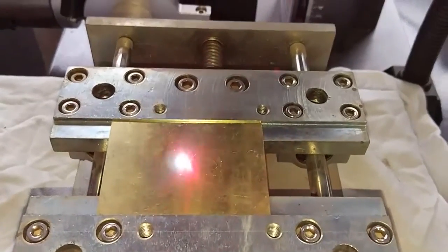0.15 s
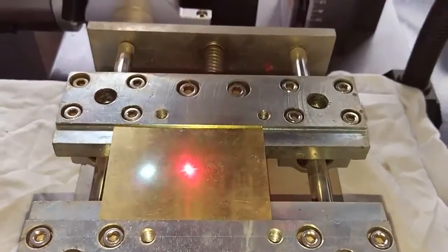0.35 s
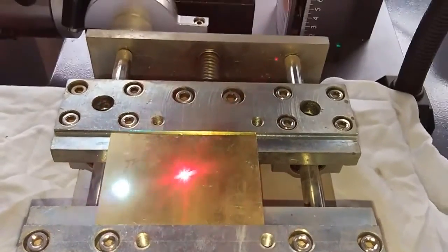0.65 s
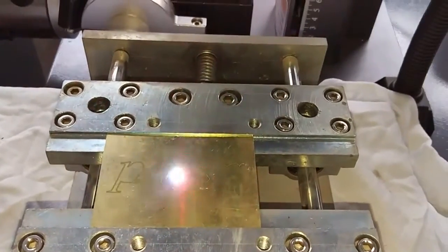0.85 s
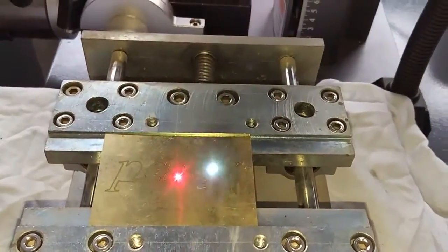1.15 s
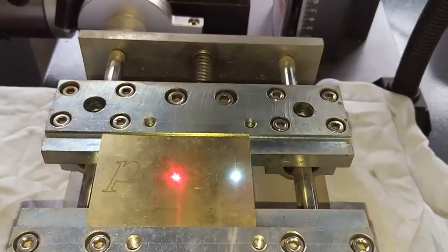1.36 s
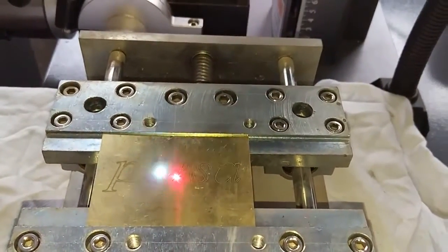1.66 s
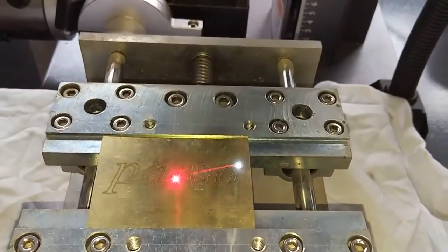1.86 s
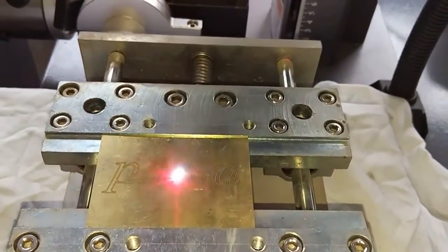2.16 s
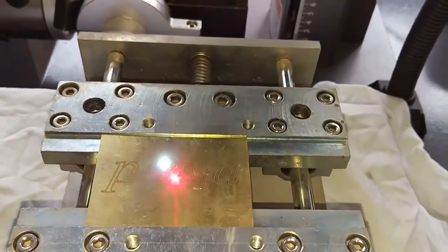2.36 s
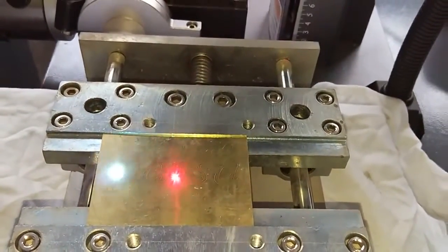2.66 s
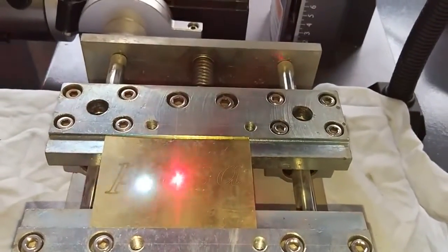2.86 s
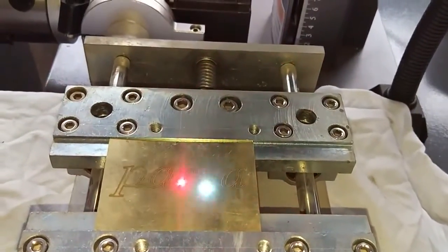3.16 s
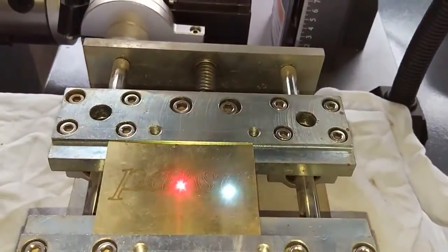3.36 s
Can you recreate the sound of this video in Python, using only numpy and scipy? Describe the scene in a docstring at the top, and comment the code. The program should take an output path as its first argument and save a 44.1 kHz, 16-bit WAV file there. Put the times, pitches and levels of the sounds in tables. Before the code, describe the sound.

Close to an engraving machine, a laser burns into metal with a bright hiss and a steady high whine. Uneven buzzing sputters and occasional sharp pops come from the left, while faint machine hum and air run underneath.

```python
"""At an engraving machine, close up: a laser marks a brass plate. Mirrors sweep the beam about 925
times a second. Every sweep blasts sparks off the metal, making a harsh hiss and a high whine on the
sweep's overtones (whole multiples of its rate). A low, sizzling sputter, one uneven pulse per sweep,
flares and sinks almost only on the left, with a few spits and pops. The beam pauses briefly between
shapes, while the machine's faint hum and cooling air carry on."""
import sys
import numpy as np
from scipy import signal
from scipy.fft import rfft, irfft, next_fast_len
from scipy.io import wavfile
from scipy.ndimage import uniform_filter1d, map_coordinates

SR = 44100
rng = np.random.default_rng(int(sys.argv[2]) if len(sys.argv) > 2 else 0)


def transcribe(u):
    """Save the signal u as a 16-bit wav file named by the first command-line argument.

    u: samples, shape (n,) or (channels, n), limited to [-1, 1]; the rate is SR.
    q: integer samples, one column per channel.
    """
    v = np.clip(np.atleast_2d(u).T, -1, 1)
    q = np.round(v * 32767).astype(np.int16)
    wavfile.write(sys.argv[1], SR, q)


N = 154350

# moments when the sputter flares up: start_s, length_s, rasp_db, tone_db, octave_db
FLARES = [(0.082, 0.005, -45, -36.5, -66), (0.188, 0.064, -40, -39.5, -57), (0.323, 0.022, -34.5, -34, -54),
          (0.395, 0.022, -36, -34, -46), (0.561, 0.0091, -33, -36.5, -60), (0.601, 0.011, -34, -35, -45),
          (0.632, 0.024, -29.5, -33.5, -53), (0.67, 0.025, -32, -30, -53), (0.706, 0.042, -28.5, -25, -36),
          (0.732, 0.035, -25, -39, -42), (0.811, 0.033, -22.5, -25.5, -37), (0.876, 0.028, -26.5, -36, -57),
          (0.934, 0.029, -23.5, -26.5, -52), (0.992, 0.03, -27.5, -28, -42.5),
          (1.056, 0.035, -29.5, -36.5, -47), (1.252, 0.014, -33.5, -32.5, -46),
          (1.394, 0.041, -30.5, -34, -47.5), (1.452, 0.038, -26, -32, -59),
          (1.502, 0.0098, -25.5, -25, -38), (1.521, 0.0097, -33, -39, -37), (1.555, 0.0058, -32, -32, -41),
          (1.589, 0.047, -26, -33, -45.5), (1.646, 0.011, -27.5, -25.5, -45),
          (1.681, 0.012, -31, -26, -37.5), (1.704, 0.013, -28, -33, -45), (1.757, 0.041, -39, -39.5, -50),
          (1.945, 0.01, -39.5, -36, -74), (1.983, 0.0094, -37.5, -39.5, -61),
          (2.031, 0.0092, -32, -35, -40), (2.147, 0.045, -38, -39.5, -65),
          (2.294, 0.014, -32.5, -36.5, -44), (2.38, 0.023, -23, -30.5, -47), (2.441, 0.022, -35, -36, -46),
          (2.523, 0.01, -31, -33, -39), (2.561, 0.017, -25.5, -26.5, -32.5),
          (2.58, 0.034, -22.5, -24.5, -32.5), (2.625, 0.022, -22.5, -31, -37),
          (2.646, 0.033, -28.5, -35, -40), (2.737, 0.0091, -18.5, -23.5, -28),
          (2.746, 0.022, -21, -23.5, -35), (2.784, 0.012, -22, -30, -40), (2.798, 0.067, -24, -26, -29),
          (2.887, 0.033, -22, -24.5, -43), (2.942, 0.0087, -24.5, -24, -30),
          (2.959, 0.021, -20.5, -21.5, -46), (3.135, 0.0092, -28.5, -32.5, -36),
          (3.18, 0.0072, -27, -29, -56)]


def amp(db):
    """Turn decibels into a number to multiply a sound by."""
    return 10 ** (np.asarray(db) / 20)


def unit(x):
    """Scale a sound to an average strength (rms) of 1."""
    return x / np.sqrt(np.mean(x ** 2) + 1e-20)


def curves(rows):
    """Join a table's points with straight lines: one curve for each column after the time."""
    times, *columns = np.transpose(rows)
    return [np.interp(np.arange(N) / SR, times, column) for column in columns]


def wobble(rate):
    """A smooth curve through `rate` random values a second."""
    return map_coordinates(rng.standard_normal(int(N * rate / SR) + 4), [np.arange(N) * rate / SR])


def gate(start_s, length_s, edge_s):
    """Switch from 0 to 1 and back, with a short fade at each end."""
    t = np.arange(N) / SR
    return np.clip(np.minimum(t - start_s, start_s + length_s - t) / edge_s + .5, 0, 1)


def filtered(x, response):
    """Turn each frequency of a sound up or down by response(hz)."""
    size = next_fast_len(N + SR // 2)
    return irfft(rfft(x, size) * response(np.fft.rfftfreq(size, 1 / SR)), size)[..., :N]


def coloured(x, colour):
    """Give a sound a colour: a list of frequencies and how strong each one is."""
    freq_hz, level_db = np.transpose(colour)

    def response(hz):
        cepstrum = irfft(np.log(amp(np.interp(np.log(hz + 1), np.log(freq_hz + 1), level_db))))
        # folding it in half makes the filter ring only after a sound, never before
        cepstrum[1:len(cepstrum) // 2] *= 2
        cepstrum[len(cepstrum) // 2 + 1:] = 0
        return np.exp(rfft(cepstrum))
    return filtered(x, response)


def patchy(x, depth_db):
    """Make a noise flicker in small patches of time and frequency."""
    spectrum = signal.stft(x, nperseg=512)[2]
    patches = uniform_filter1d(rng.standard_normal(spectrum.shape), size=5, axis=1)
    patches = uniform_filter1d(patches, size=6, axis=2)
    return signal.istft(spectrum * amp(depth_db * unit(patches)), nperseg=512)[1][:, :N]


def overtone(sweeps, k):
    """A tone at k times the sweep rate, shifted so that the peaks of different tones do not pile up."""
    return np.exp(2j * np.pi * round(k) * sweeps + 1j * round(k) ** 2)


def sparks(sweeps, depth, scatter_db):
    """Noise that bursts once a sweep, each burst with its own strength."""
    strength = amp(scatter_db * (2 * rng.random(N) - 1))[sweeps.astype(int)]
    bursts = np.exp(-depth * np.cos(2 * np.pi * sweeps))
    return unit(strength * bursts * rng.standard_normal(N))


def hiss(sweeps):
    """Sparks crackle brightly on both sides, with thin overtones of the sweep on the left."""
    # how the hiss swells: time_s, level_db, treble_boost_db
    swells = [(0, -44.5, 20), (0.06, -34, 6), (0.14, -33.5, 3), (0.28, -32.5, 2), (0.47, -36, 6),
              (0.6, -33, 2), (0.75, -30.5, 2), (0.89, -30.5, 6), (0.95, -26.5, 4), (1.03, -29, 0),
              (1.25, -29, 3.5), (1.48, -29.5, 7.5), (1.63, -29.5, 8), (1.78, -31, 3), (1.95, -32, 7),
              (2.08, -29, 4), (2.22, -28, 3), (2.45, -28, 3.5), (2.68, -28, 2), (2.82, -26.5, -7),
              (3.05, -30, -6), (3.28, -30.5, -3), (3.5, -32.5, 1)]
    # colour of the sparks on each side: freq_hz, level_db
    left_colour = [(100, -37), (250, -19), (1200, -15.5), (2400, -10.5), (4000, -8.5), (5200, -10),
                   (7000, -13), (8500, 2), (11000, 2), (13000, -3.5), (15800, -7)]
    right_colour = [(100, -45), (1000, -19.5), (2000, -7.5), (3300, -11), (5200, -6), (6500, -4.5),
                    (8200, -4.5), (9100, -11), (9900, -34), (10300, -3.5), (11200, -15.5), (12200, -19),
                    (14000, -10.5), (15600, -22)]
    # thin high tones: sweep_multiple, level_db
    high_tones = [(10, -14), (11, -13), (12, -11), (14, -15)]
    level_db, treble_boost_db = curves(swells)
    left = coloured(sparks(sweeps, depth=.3, scatter_db=1), left_colour)
    right = coloured(sparks(sweeps, depth=.2, scatter_db=1), right_colour)
    pair = patchy(np.array([left, right]) / left.std(), depth_db=2)
    treble = filtered(pair, lambda hz: np.clip((hz - 12000) / 2000, 0, 1))
    pair += treble * (amp(treble_boost_db * np.array([[1], [.4]])) - 1)
    for k, db in high_tones:
        pair[0] += amp(db + 2.8 * wobble(25)) * overtone(sweeps, k).real
    swell_db = (level_db - level_db.mean()) * np.array([[1], [.1]])  # the right side barely swells
    return pair * amp(level_db.mean() + 0.68 + swell_db + 0.9 * wobble(45))


def whine(sweeps):
    """The sweep's middle overtones sing, each a wavering tone with a narrow band of noise around it."""
    # tones of the whine: sweep_multiple, left_db, right_db
    tones = [(2, -15, -10.5), (4, -22.5, -7.5), (5, 0, -2.5), (6, 0.5, -0.5), (7, 1.5, -7.5), (8, -4, -24)]
    # how the whole whine swells: time_s, left_db, right_db
    swells = [(0, -42, -43.5), (0.22, -35.5, -36), (0.4, -38, -36), (0.55, -37.5, -43), (0.75, -35.5, -49),
              (1, -38.5, -37.5), (1.2, -39, -36.5), (1.36, -40, -41.5), (1.56, -42, -51), (1.6, -32.5, -42),
              (1.7, -36.5, -48), (1.78, -42.5, -38), (1.95, -42, -48), (2.09, -41.5, -41),
              (2.17, -34.5, -32), (2.26, -38.5, -36.5), (2.4, -34, -30.5), (2.6, -36, -34.5),
              (2.7, -34.5, -37), (2.9, -33, -40), (3.1, -34.5, -32.5), (3.27, -33, -33), (3.36, -38, -34.5),
              (3.5, -36.5, -36)]
    out = np.zeros((2, N))
    for k, left_db, right_db in tones:
        both_sides = amp(2 * wobble(55)) + .28 * (wobble(260) + 1j * wobble(260))
        for side, db in enumerate((left_db, right_db)):
            this_side = .3 * (wobble(330) + 1j * wobble(360))
            sway = amp(2.8 * wobble(70)) * np.exp(.35j * wobble(36))  # in level and in pitch
            out[side] += amp(db) * (sway * (both_sides + this_side) * overtone(sweeps, k)).real
    return out * amp(np.array(curves(swells)) - 3 + 1.5 * wobble(35.14))


def pulses(sweeps, colour, scatter_db, even=1):
    """One pulse in the middle of each sweep; even=0 keeps only the uneven, toneless part."""
    middles = np.flatnonzero(np.diff(np.floor(sweeps + .5)))
    strength = amp(scatter_db * rng.standard_normal(N)[:len(middles)])
    clicks = np.bincount(middles, (1 - even) * strength.mean() - strength, N)
    return unit(coloured(clicks - clicks.mean(), colour))


def flaring(simmer_db, peaks_db, rise_s=0.00087, fall_s=0.0041):
    """A level that leaps from a low simmer to each flare's peak, holds and dies away."""
    t = np.arange(N) / SR
    level = amp(simmer_db)
    for (start_s, length_s, *_), db in zip(FLARES, peaks_db):
        fade = np.maximum(start_s - t, 0) / rise_s + np.maximum(t - start_s - length_s, 0) / fall_s
        level = np.maximum(level, amp(db) * np.exp(-fade))
    return level


def sputter(sweeps):
    """A low, sizzling sputter, one uneven pulse per sweep, flares and sinks almost only on the left."""
    # the sputter between flares: time_s, level_db
    simmer = [(0, -54), (0.14, -48), (0.5, -45), (0.62, -39.5), (0.76, -27.5), (0.92, -29), (1.04, -39),
              (1.2, -43), (1.36, -41.5), (1.52, -36.5), (1.66, -35.5), (1.76, -40.5), (1.88, -49),
              (2.1, -41.5), (2.27, -47.5), (2.42, -26.5), (2.5, -40), (2.72, -40), (2.77, -27.5),
              (3.0, -23.5), (3.07, -51), (3.17, -41), (3.5, -46.5)]
    # strength of the sizzle within the sputter: time_s, level_db
    sizzling = [(0, 4.5), (.72, -4.5), (1.05, -5.5), (1.62, -2), (2.2, -3), (2.6, 0), (2.9, -1.5),
                (3.15, 0)]
    # colours of the low rasp and of the sizzle: freq_hz, level_db
    rasp_colour = [(50, -41), (110, -20), (160, 0.5), (220, 11.5), (400, 7), (650, 3.5), (850, 5.5),
                   (1300, -2.5), (2500, -7.5), (6500, -27), (15000, -62)]
    sizzle_colour = [(50, -34), (160, -13.5), (400, -9), (800, -0.5), (1200, -4.5), (2500, -4.5),
                     (4000, -7.5), (7000, -10.5), (11000, -13.5), (15000, -10.5)]
    # higher tones that flare with the octave (twice the sweep rate): sweep_multiple, level_db
    buzz_tones = [(3, -1.5), (4, -4.5)]
    simmer_db = curves(simmer)[0] + 2.3 * wobble(70)
    _, _, rasp_db, tone_db, octave_db = np.transpose(FLARES)
    rasp = amp(-5.5 + 1.5 * wobble(75)) * pulses(sweeps, rasp_colour, scatter_db=0.5, even=0)
    sizzle_level = amp(curves(sizzling)[0] + 0.99 * wobble(130))
    sizzle = sizzle_level * unit(coloured(sparks(sweeps, depth=0.22, scatter_db=-3), sizzle_colour))
    tone = amp(3.5 + 1.5 * wobble(75)) * overtone(sweeps, 1).real
    octave = amp(3) * overtone(sweeps, 2).real
    buzz = sum(amp(db + 2.8 * wobble(18)) * overtone(sweeps, k).real for k, db in buzz_tones)
    out = flaring(simmer_db, rasp_db) * (rasp + sizzle)
    out += flaring(simmer_db - 7.5, tone_db) * tone
    out += flaring(simmer_db - 17.5, octave_db) * (octave + buzz)
    return out * amp([[0], [-32]])  # left, right


def hum():
    """The machine gives off faint, wavering tones, stronger on the right."""
    # tones of the machine: pitch_hz, level_db
    tones = [(570, -98), (640, -76), (6880, -62)]
    t = np.arange(N) / SR
    out = np.zeros(N)
    for hz, db in tones:
        level = amp(db + 7.1 * wobble(23.3))
        out += level * np.sin(2 * np.pi * hz * t + 2.7 * wobble(32))
    return out * amp([[-4], [0]])


def cooling_air():
    """The machine's cooling air makes a faint, steady rush."""
    # colour of the rushing air: freq_hz, level_db
    air_colour = [(25, -37), (90, -46), (200, -3.5), (600, -2.5), (1000, -5), (2500, -7), (8000, -15.5),
                  (15000, -6)]
    return amp(-47) * unit(coloured(rng.standard_normal((2, N)), air_colour))


def spits(sweeps, slow_spells):
    """Longer, slower sweeps give sharp, fairly even pulses, heard as a spitting chirp."""
    # colour of a spit: freq_hz, level_db
    spit_colour = [(50, -54), (200, -57), (800, 0.5), (1600, -0.5), (2500, 3.5), (4000, -3), (6000, -2),
                   (12000, -23)]
    level = sum(amp(db) * gate(start_s, length_s, edge_s=0.0025) for start_s, length_s, db in slow_spells)
    return level * pulses(sweeps, spit_colour, scatter_db=2.5) * amp([[0], [-20]])


def beam_level():
    """The beam's sounds dip briefly as it jumps between shapes."""
    # pauses of the beam: start_s, length_s, dip_db
    pauses = [(1.564, 0.012, -10.5), (1.858, 0.0069, -9), (1.996, 0.024, -18)]
    return amp(sum(db * gate(start_s, length_s, edge_s=0.0065) for start_s, length_s, db in pauses))


def pops():
    """Now and then a sharp pop stands out from the sputter, on the left."""
    # sharp pops: start_s, peak_db
    pop_times = [(1.718, -20), (2.743, -6), (2.961, -15), (3.141, -17), (3.185, -17)]
    # colour of a pop: freq_hz, level_db
    pop_colour = [(50, -36), (200, 1), (800, 6), (2700, -11), (4500, -24), (15000, -40)]
    clicks = np.zeros(N)
    for start_s, db in pop_times:
        clicks[round(start_s * SR)] = amp(db)
    out = coloured(clicks, pop_colour)
    return out * clicks.max() / np.abs(out).max() * amp([[0], [-24]])


def scene():
    """The mirrors set one beat for the hiss, whine, sputter and spits; pops, hum and air join them."""
    # spells of slower sweeps, each heard as a spit: start_s, length_s, level_db
    slow_spells = [(0.273, 0.019, -38), (0.348, 0.0098, -33), (0.416, 0.0095, -42), (0.682, .012, -29),
                   (0.766, 0.011, -31), (0.817, .012, -24), (1.191, 0.013, -42), (1.275, 0.019, -32),
                   (1.501, 0.0085, -24), (2.383, 0.01, -25), (2.448, 0.012, -28.5), (2.788, 0.0095, -34),
                   (2.922, 0.0098, -24.5), (3.24, 0.0091, -36.5), (3.296, 0.012, -33.5)]
    sweep_hz, slow_hz = 925, 816.5
    slow = sum(gate(start_s, length_s, edge_s=0.0021) for start_s, length_s, _ in slow_spells)
    # the rate drifts and jitters, and jitters more in the slow spells
    unsteady = .0036 * wobble(22) + .004 * wobble(250) + .02 * slow * wobble(500)
    rate_hz = (sweep_hz + (slow_hz - sweep_hz) * slow) * (1 + unsteady)
    sweeps = np.cumsum(rate_hz) / SR  # how many sweeps have gone by
    marking = sputter(sweeps) + spits(sweeps, slow_spells) + pops() + hiss(sweeps)
    marking += amp(-7 * slow) * whine(sweeps)  # quieter in the slow spells
    return beam_level() * marking + hum() + cooling_air()


def record(dry):
    """The camera cuts the deep bass and the very highest treble."""
    low_cut_hz, top_hz = 101, 15780
    return filtered(dry, lambda hz: hz ** 2 / np.hypot(hz ** 2, low_cut_hz ** 2) * (hz < top_hz))


dry = scene()
out = record(dry)
transcribe(out)
```